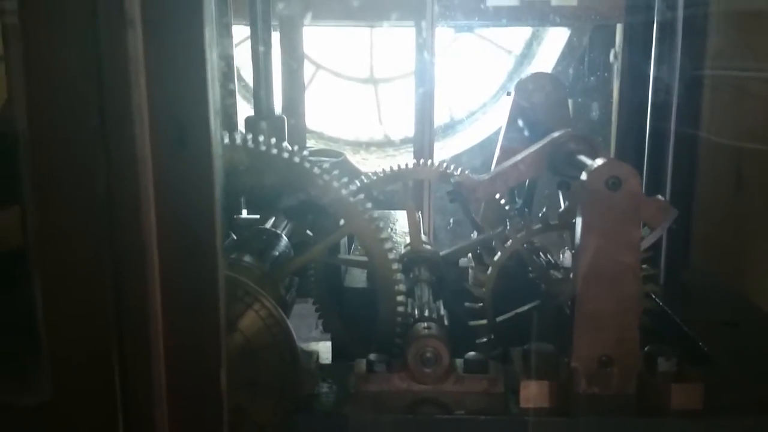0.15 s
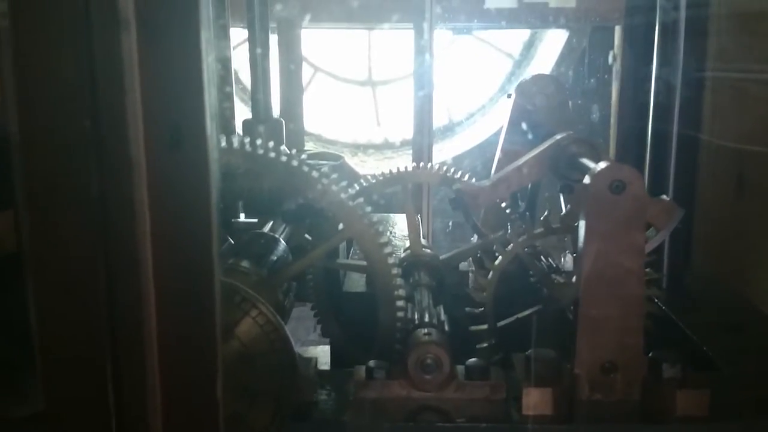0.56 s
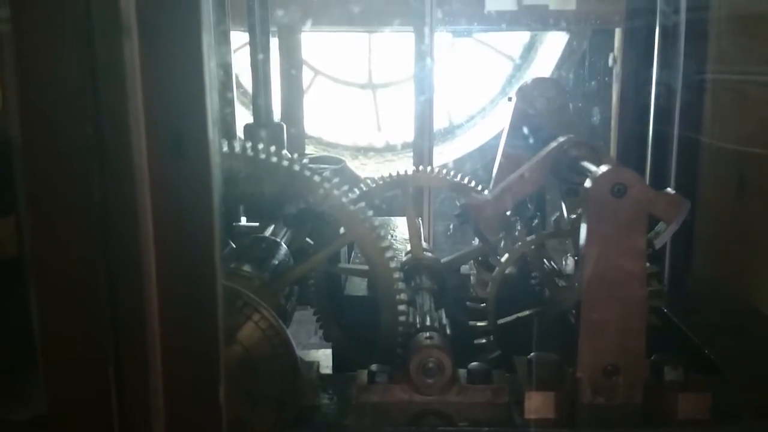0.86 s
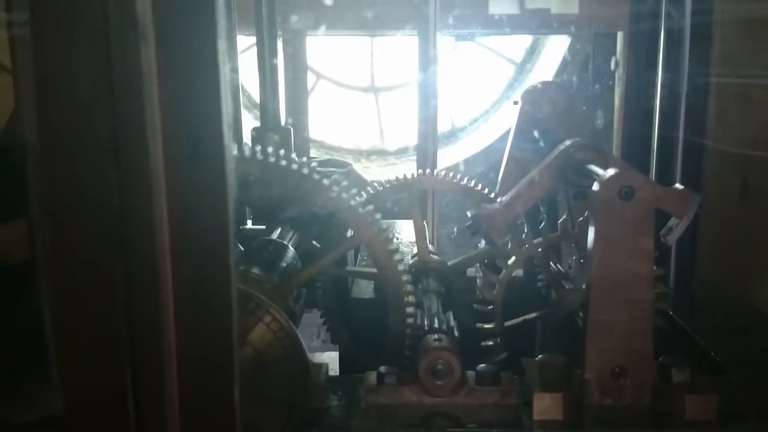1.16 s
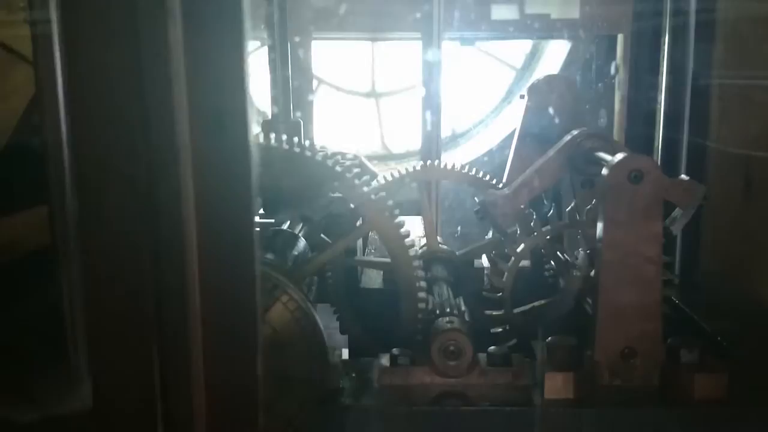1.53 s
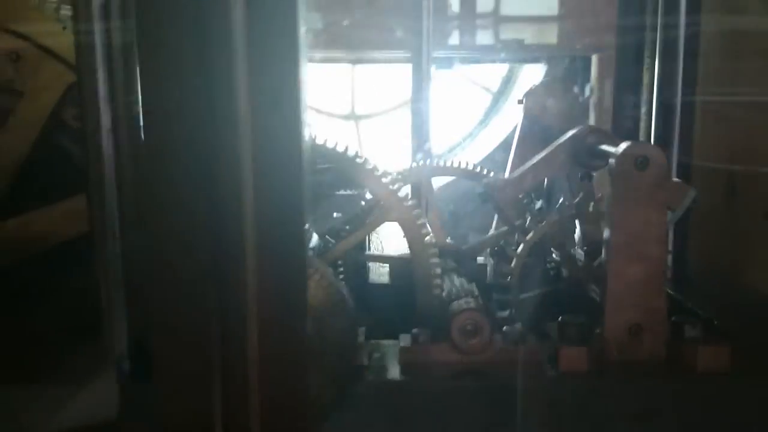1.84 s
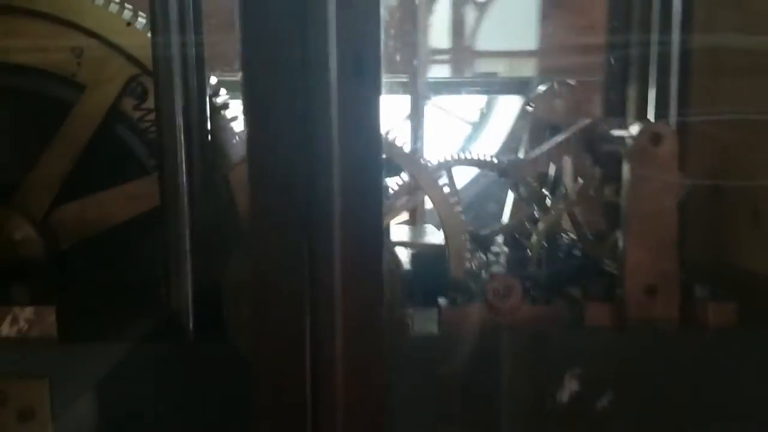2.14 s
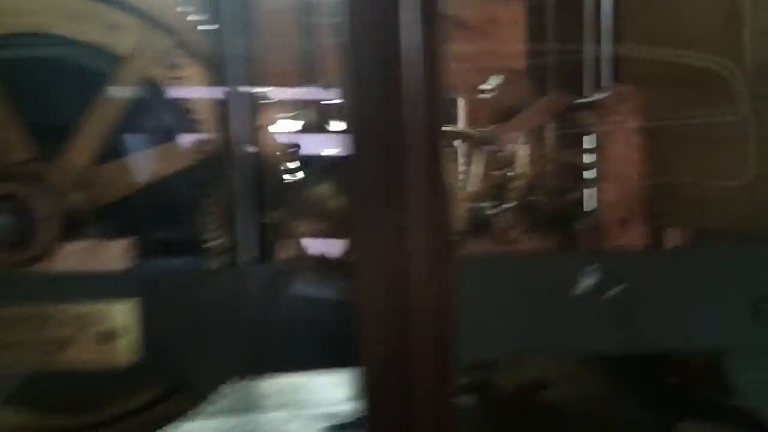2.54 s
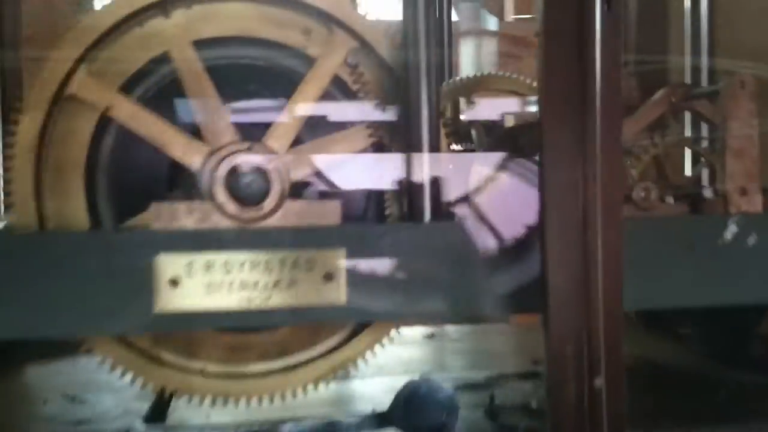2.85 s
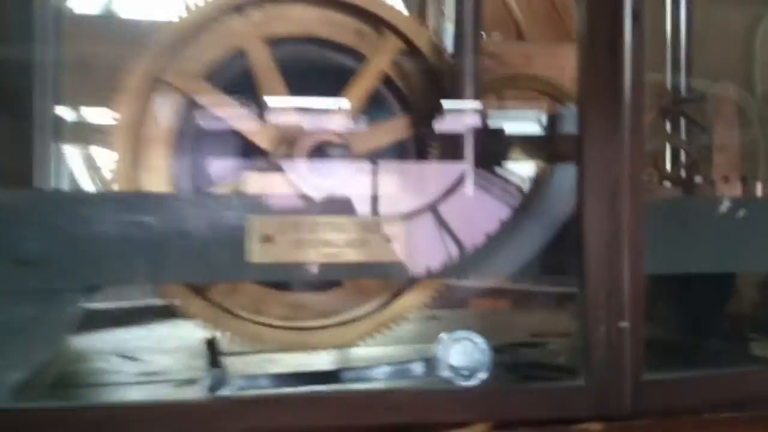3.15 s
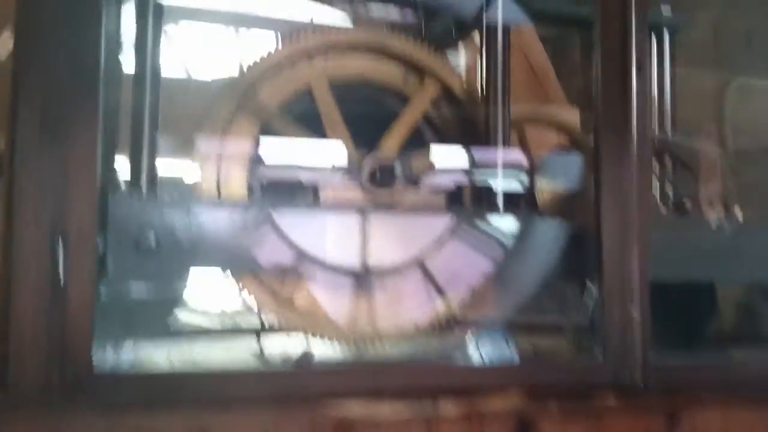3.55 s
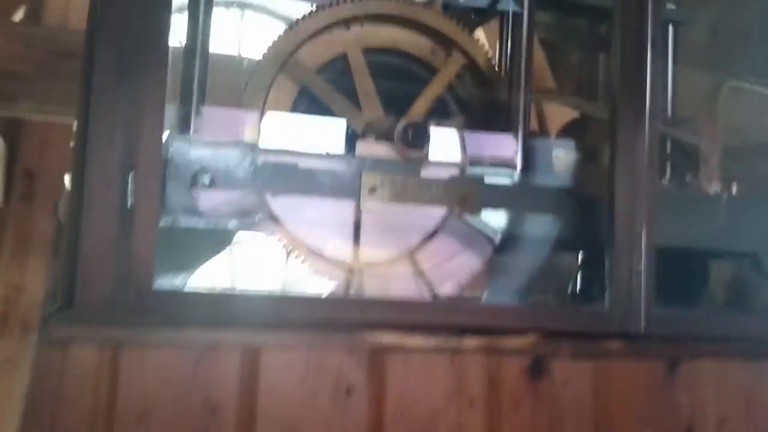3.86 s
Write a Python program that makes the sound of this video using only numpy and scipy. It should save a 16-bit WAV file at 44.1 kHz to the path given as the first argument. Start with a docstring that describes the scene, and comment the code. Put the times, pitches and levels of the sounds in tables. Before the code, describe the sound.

Tower clock mechanism ticks about once a second in a quiet loft, with late microphone handling bumps

```python
"""A quiet loft: a tower clock ticks about once a second inside its glazed wooden case.
Each drop of the escapement rattles the frame (noise dying band by band) and rings wheels and pallets (tones).
Fingers bump, click and rub the shell of a hand-held camera, mostly from halfway and near the right microphone:
bumps are filtered pushes into resonances, rubs are coloured stick-slip grains. One metallic clink sounds.
Faint air noise, hum and whine lie underneath."""
import sys
import numpy as np
from scipy import signal
from scipy.fft import rfft, irfft
from scipy.io import wavfile
from scipy.ndimage import uniform_filter1d

SR = 44100
rng = np.random.default_rng(int(sys.argv[2]) if len(sys.argv) > 2 else 0)


def unload_wav(signal):
    """Save mono or channel-first audio to the path in sys.argv[1] as 16-bit WAV at rate SR, clipped to [-1, 1]."""
    wavfile.write(
        sys.argv[1],
        SR,
        np.round(np.clip(np.atleast_2d(signal).T, -1, 1) * 32767).astype(np.int16),
    )


N = 176400
T = np.arange(N) / SR  # s

# Still air and hiss. Each row: frequency in Hz, relative level in dB per Hz.
LOFT_SPECTRUM = [(25, -18.5), (64, -6), (113, -12), (150, -15), (260, -15), (360, -15.5), (700, -16.5),
                 (2000, -21), (5600, -25.5), (15500, -28.5)]
LOFT_DB = -66
# Faint hum and whine. Each row: frequency in Hz, level in dB.
LOFT_TONES = [(59, -88), (264, -87.5), (15000, -83)]

# Finger contacts. Each row: start in seconds, thud push in dB, knock push in dB,
# contact brightness (low-pass) in Hz, base t60 of the thud in seconds.
BUMPS = [(0.097, -56, -41, 245, .04), (0.415, -47, -70, 302, .07), (2.161, -59, -49, 1200, 0.044),
         (2.3985, -38, -39, 710, 0.035), (2.409, -19.5, -11.5, 1130, 0.089),
         (2.492, -24.5, -43, 486, 0.043), (2.542, -50.5, -51, 300, 0.064), (2.796, -23, -23.5, 800, 0.032),
         (2.83, -33, -44, 600, 0.048), (2.902, -45, -32, 800, 0.045), (3.106, -37.5, -41.5, 590, 0.054),
         (3.344, -34.5, -38, 596, 0.057), (3.382, -17.5, -31, 800, 0.055), (3.412, -45, -30, 1200, 0.066),
         (3.419, -15.5, -50, 257, 0.048), (3.519, -22, -24, 795, 0.028), (3.534, -25.5, -23.5, 1480, 0.033),
         (3.539, -58, -19, 1590, 0.044), (3.5443, -37, -20, 1480, 0.036), (3.653, -15, -27, 225, 0.13),
         (3.726, -23, -36, 593, .1), (3.742, -23.5, -17.5, 1010, .08), (3.812, -6.5, -14, 560, 0.19),
         (3.846, -14.5, -19, 295, 0.074), (3.8625, -35, -27, 1300, .06), (3.875, -17, -22, 500, 0.19),
         (3.8944, -28, -28, 1500, .1), (3.933, -18.5, -26, 1100, 0.15), (3.9654, -20.5, -12, 3230, 0.066)]
# Slow flexing of the shell. Each row: frequency in Hz, gain in dB, share of the bump's base t60 [ratio].
THUD_MODES = [(57, 3, 0.68), (78, -6, 0.83), (124.7, -0.5, 0.35), (182, -12.5, 0.16)]
THUD_SOFT_HZ, THUD_SOFT_SHARE, THUD_HIGHPASS_HZ, THUD_LEFT_DB = 250, 0.37, 39, -28
# Knock of the shell. Each row: frequency in Hz, gain at right in dB, t60 in seconds, left re right in dB.
KNOCK_MODES = [(210, -9, 0.014, -18), (316.4, -0.5, 0.031, -23.5), (437, -1, 0.019, -26),
               (663, -7, .016, -23), (1190, -21, 0.014, -6.5), (1920, -9.5, 0.0027, -13),
               (4500, -17.5, 0.018, 4)]

# Escapement drops. Each row: start in seconds, level in dB, extra treble of the frame in dB,
# voicing [index] (0 first pallet, 1 second pallet, 2 first pallet heard beside the great wheel).
TICKS = [(0.803, -45, 1, 0), (1.828, -46, -3.5, 1), (2.801, -43, 0, 2), (3.83, -42, -4.5, 1)]
RISE_S, RATTLE_S, TREBLE_HZ = 0.0033, 0.031, 6000
# Dense frame modes. Each row: frequency in Hz, relative level in dB per Hz.
FRAME_SPECTRUM = [(100, -13), (210, -14), (290, 2.5), (450, -5), (620, -6.5), (860, -3.5), (1150, -15.5),
                  (1800, -11.5), (2700, -17.5), (3200, -15.5), (4000, -17), (4800, -12.5), (5600, -15),
                  (6500, -24.5), (10000, -22.5), (13000, -25.5), (15500, -18)]
# Decay of the case. Each row: frequency in Hz, t60 in seconds.
CASE_T60 = [(200, 0.45), (800, 0.28), (2000, 0.26), (5000, 0.23), (15000, 0.28)]
# Wheel and pallet modes. Each row: frequency in Hz, level re the tick in dB for voicings 0, 1 and 2,
# t60 in seconds.
WHEEL_MODES = [(283, -22, -8, -25, 0.32), (335, -5.5, -25, -18, 0.39), (430, -8, -37, -2, 0.36),
               (482.7, -9.5, -24, -12, 0.36), (570, -28, -17, -20, 0.29), (713, -10, -27, -3.5, 0.34),
               (820, -15, -15.5, -28, 0.14), (1419, -13, -13.5, -13, 0.11), (1540, -34, -32, -20.5, 1),
               (1800, -14.5, -18, -22, 0.43), (1820, -17.5, -36, -20, 0.87), (3110, -13.5, -15, -31, .2),
               (4710, -9.5, -12, -30, 0.21), (4840, -38, -10, -36, 0.31), (5370, -27, -15, -30, 0.35),
               (14800, -8, -25, -18, .17)]
MODE_WIDTH_HZ, MODE_WIDTH_SHARE = 9.95, 0.01206

# Small dry clicks of the grip. Each row: start in seconds, level before the trim in dB, left minus right in dB.
CLICKS = [(1.552, -64, -12), (1.558, -49, -8), (1.565, -49, -13), (1.5735, -40, -7), (1.604, -49, -8),
          (2.004, -42, -4), (2.139, -54, -1), (2.1615, -42.5, 0), (2.491, -40.5, -8), (2.943, -44, 8),
          (3.105, -45, -4), (3.207, -47, -2), (3.4, -31, -22), (3.497, -43, -13), (3.753, -32, -13),
          (3.965, -38, 8)]
# Colour of the clicks. Each row: frequency in Hz, relative level in dB per Hz.
CLICK_SPECTRUM = [(300, -2), (3300, -13.5), (4900, 3.5), (5700, -4.5), (7000, -13), (11000, -4),
                  (15500, -3.5)]
CLICK_TRIM_DB, CLICK_RISE_S, CLICK_HOLD_S, CLICK_T60_S = -6.5, 0.00043, 0.00033, 0.0095

# Metal modes of the clink. Each row: frequency in Hz, relative level in dB.
CLINK_MODES = [(3650, -13.5), (4300, -20), (4950, -27), (5600, 0.5), (5900, -3), (7050, -21)]
# Colour of the clink's room tail. Each row: frequency in Hz, relative level in dB per Hz.
CLINK_TAIL_SPECTRUM = [(2500, -14.5), (3500, -20), (5000, -9), (5600, -1.5), (6100, -9), (6800, -18.5),
                       (15000, -23)]
CLINK_START_S, CLINK_DB, CLINK_T60_S, CLINK_WIDTH_HZ = 2.342, -34.5, 0.012, 150
CLINK_TAIL_DB, CLINK_TAIL_HOLD_S, CLINK_TAIL_T60_S = -17, 0.016, 0.26  # level re the ping

# Skin rubbing on the shell, in three spells. Each row: time in seconds,
# then levels before the trims in dB of the middle, the hiss and the top.
RUB_FIRST = [(2.62, -81, -69, -90), (2.626, -87, -88, -90), (2.656, -69.5, -68.5, -88),
             (2.686, -77, -77, -77), (2.708, -56.5, -68.5, -80), (2.73, -78, -80, -79),
             (2.76, -75, -70, -88)]
RUB_SECOND = [(2.88, -55, -65, -71), (2.908, -57.5, -56.5, -70), (2.924, -69, -65, -68),
              (3.064, -73.5, -75, -82), (3.112, -63.5, -54, -64), (3.122, -68, -66.5, -72),
              (3.142, -67, -61.5, -70), (3.164, -59.5, -61.5, -69), (3.22, -56, -53.5, -71),
              (3.316, -62, -63, -72), (3.352, -58.5, -57, -69), (3.36, -59, -60, -69)]
RUB_THIRD = [(3.36, -61.5, -64, -72), (3.392, -37.5, -39, -55), (3.426, -49.5, -48.5, -50),
             (3.468, -67.5, -63, -67), (3.5, -48.5, -51.5, -58), (3.526, -55, -61, -64.5),
             (3.54, -47, -56, -62), (3.57, -58.5, -57.5, -61), (3.66, -65.5, -57.5, -64),
             (3.678, -64, -46.5, -56), (3.71, -55, -49.5, -58.5), (3.746, -39.5, -43, -54.5),
             (3.772, -45.5, -45, -50.5), (3.816, -40, -51.5, -58), (3.826, -47.5, -53, -60),
             (3.862, -47.5, -49, -58), (3.956, -54, -53, -62), (3.966, -39, -46, -65),
             (3.984, -50, -49.5, -58), (4.0, -64, -49, -58)]
# Colours of the three rub bands. Each row: frequency in Hz, relative level in dB per Hz.
RUB_MIDDLE_SPECTRUM = [(60, 3), (130, 3.5), (220, -4), (330, 5.5), (480, -1), (670, -1.5), (900, -11),
                       (1150, -7.5), (1600, -15), (2200, -16.5), (3300, -24.5), (6000, -34.5)]
RUB_HISS_SPECTRUM = [(2000, -12), (3300, -14), (4400, -3), (5500, -0.5), (6300, -10.5), (7500, -23),
                     (10000, -26)]
RUB_TOP_SPECTRUM = [(4500, -32), (7000, -0.5), (10000, 0.5), (13000, -4), (15500, 3)]
# Relative trims of middle, hiss and top in dB, before the common trim.
RUB_TRIMS_DB = [4.5, 0, 2]
RUB_COMMON_TRIM_DB = 3
# Left minus right of middle, hiss and top in dB.
RUB_PAN_DB = [-12.5, -1, -3.5]
SLIPS_PER_S, SLIP_SPREAD_DB, RUB_FLUTTER_DB = 2600, 2.5, 1.5
SHELL_RIPPLE_DB, SHELL_RIPPLE_HZ = 3, 59.4  # rms unevenness, smoothing width

LOW_CUT_HZ, HIGH_CUT_HZ = 32, 15850


def from_db(db):
    """Decibels to gain."""
    return 10 ** (np.asarray(db) / 20)


def rms_one(x):
    """Scale to rms 1."""
    return x / np.sqrt(np.mean(x ** 2) + 1e-20)


def at_hz(points, hz):
    """Read a table on a log-frequency axis."""
    f, value = np.transpose(points)
    return np.interp(np.log(hz + 1e-9), np.log(f), value)


def pan(db):
    """Left and right gains of equal total power; db is left minus right."""
    return rms_one(from_db([[db / 2], [-db / 2]]))


def white():
    """Unrelated noise in each channel."""
    return rng.standard_normal((2, N))


def colour(x, spectrum):
    """Give a steady signal a spectrum; rms 1."""
    hz = np.arange(N // 2 + 1) * SR / N
    return rms_one(irfft(rfft(x) * from_db(at_hz(spectrum, hz)), N))


def line(hz, width_hz):
    """A cluster of close modes: an even tone whose phase wanders, differently at each microphone."""
    steps = white() * np.sqrt(2 * np.pi * abs(width_hz) / SR)
    smooth = max(1, int(SR / (4 * abs(width_hz) + 1)))
    wander = uniform_filter1d(np.cumsum(steps, axis=1), size=smooth, axis=1)
    return np.sqrt(2) * np.sin(2 * np.pi * hz * T + wander)


def burst(start_s, rise_s, hold_s, t60_s):
    """Envelope: linear rise, exponential decay; the hold counts from the start."""
    rise = np.clip((T - start_s) / rise_s, 0, 1)
    decay_s = np.maximum(T - start_s - hold_s, 0)
    return rise * np.exp(-np.minimum(np.log(1000) * decay_s / t60_s, 40))


def ring(force, hz, t60_s):
    """Two-pole resonance: a click sets a decaying sine ringing."""
    r = np.exp(-np.log(1000) / (t60_s * SR))
    w = 2 * np.pi * hz / SR
    return signal.lfilter([0, np.sin(w)], [1, -2 * r * np.cos(w), r * r], force + 1e-18)


def push(start_s, db, hz):
    """A soft contact: one steeply low-passed click."""
    click = np.full(N, 1e-18)
    click[min(int(start_s * SR), N - 1)] = from_db(db)
    return signal.sosfilt(signal.butter(3, min(hz, SR / 4), fs=SR, output="sos"), click)


def loft():
    """Quiet air as coloured noise, with a faint hum and whine."""
    air = from_db(LOFT_DB) * colour(white(), LOFT_SPECTRUM)
    return air + sum(from_db(db) * line(hz, width_hz=9) for hz, db in LOFT_TONES)


def bumps():
    """Contacts flex the shell and knock on it; soft ones push slowly, a firm grip damps the flexing."""
    thud = 0
    for start_s, thud_db, _, contact_hz, t60_s in BUMPS:
        force = push(start_s, thud_db, min(THUD_SOFT_HZ, THUD_SOFT_SHARE * contact_hz))
        for hz, db, share in THUD_MODES:
            thud = thud + from_db(db) * ring(force, hz, t60_s * share)
    thud = signal.sosfilt(signal.butter(2, THUD_HIGHPASS_HZ, "high", fs=SR, output="sos"), thud)

    force = sum(push(start_s, db, hz) for start_s, _, db, hz, _ in BUMPS)
    knock = 0
    for k, (hz, db, t60_s, left_db) in enumerate(KNOCK_MODES):
        gains = from_db([[db + left_db], [db]])
        knock = knock + gains * ring(force, hz, t60_s) * (-1) ** k  # alternate polarity
    return thud * from_db([[THUD_LEFT_DB], [0]]) + knock


def frame_rattle():
    """Each drop shakes the frame's dense modes, which die band by band."""
    out = 0
    hz = np.arange(N // 2 + 1) * SR / N
    frame = rfft(colour(white(), FRAME_SPECTRUM))
    edges_hz = np.geomspace(50, 18000, 13)
    for low, high in zip(edges_hz, edges_hz[1:]):
        band = irfft(frame * ((hz >= low) & (hz < high)), N)
        centre_hz = np.sqrt(low * high)
        t60_s = at_hz(CASE_T60, centre_hz)
        for start_s, db, treble_db, _ in TICKS:
            gain = from_db(db + treble_db * (centre_hz > TREBLE_HZ))
            out = out + band * gain * burst(start_s, RISE_S, RATTLE_S, t60_s)
    return out


def wheel_ring():
    """Each drop rings wheel and pallet modes, balanced by its voicing."""
    out = 0
    for hz, *voicing_db, t60_s in WHEEL_MODES:
        level = 0
        for start_s, db, _, voicing in TICKS:
            level = level + from_db(db + voicing_db[voicing]) * burst(start_s, RISE_S, RATTLE_S / 2, t60_s)
        width_hz = MODE_WIDTH_HZ + MODE_WIDTH_SHARE * hz * min(1, hz / TREBLE_HZ)
        out = out + level * line(hz, width_hz)
    return out


def escapement():
    """Each drop rattles the frame and rings the wheels and pallets."""
    return frame_rattle() + wheel_ring()


def clicks():
    """Tiny snaps as the grip shifts: short bursts of coloured noise."""
    level = 0
    for start_s, db, side_db in CLICKS:
        snap = burst(start_s, CLICK_RISE_S, CLICK_HOLD_S, CLICK_T60_S)
        level = level + from_db(db + CLICK_TRIM_DB) * pan(side_db) * snap
    return colour(white(), CLICK_SPECTRUM) * level


def clink():
    """A short metallic ping of close modes with a faint diffuse room tail of noise."""
    metal = rms_one(sum(from_db(db) * line(hz, CLINK_WIDTH_HZ) for hz, db in CLINK_MODES))
    ping = metal * burst(CLINK_START_S, 0.0014, 0.003, CLINK_T60_S) * pan(db=-8)
    tail_envelope = burst(CLINK_START_S, 0.0036, CLINK_TAIL_HOLD_S, CLINK_TAIL_T60_S)
    tail = from_db(CLINK_TAIL_DB) * colour(white(), CLINK_TAIL_SPECTRUM) * tail_envelope
    return from_db(CLINK_DB) * (ping + tail)


def ripple(x):
    """Many narrow resonances of the shell, different at each microphone."""
    spectrum = rfft(x)
    width_bins = max(1, int(SHELL_RIPPLE_HZ * N / SR))
    uneven = uniform_filter1d(rng.standard_normal(spectrum.shape), size=width_bins, axis=1)
    return irfft(spectrum * from_db(SHELL_RIPPLE_DB * rms_one(uneven)), N)


def rub_level(column):
    """Level of one rub band: straight lines in dB within each spell, silence outside."""
    level = 0
    for spell in (RUB_FIRST, RUB_SECOND, RUB_THIRD):
        rows = np.array(spell)
        level = level + from_db(np.interp(T, rows[:, 0], rows[:, column], left=-np.inf, right=-np.inf))
    return level


def rubbing():
    """Dense stick-slip grains, coloured by the shell and the microphone port, swell with each stroke."""
    out = 0
    for k, spectrum in enumerate((RUB_MIDDLE_SPECTRUM, RUB_HISS_SPECTRUM, RUB_TOP_SPECTRUM)):
        hits = rng.random((2, N)) < SLIPS_PER_S / SR
        strength_db = SLIP_SPREAD_DB * np.minimum(rng.exponential(1, (2, N)), 4)
        slips = hits * white() * from_db(strength_db)
        wobble = rms_one(uniform_filter1d(rng.standard_normal(N), size=300))
        flutter = from_db(RUB_FLUTTER_DB * wobble)
        gain = from_db(RUB_TRIMS_DB[k] + RUB_COMMON_TRIM_DB) * pan(RUB_PAN_DB[k])
        out = out + colour(ripple(slips), spectrum) * flutter * rub_level(k + 1) * gain
    return out


def scene():
    """The room, the handling and the clock."""
    return loft() + bumps() + escapement() + clicks() + clink() + rubbing()


def record(dry):
    """The deepest bass and the top are cut."""
    dry = signal.sosfilt(signal.butter(3, LOW_CUT_HZ, "high", fs=SR, output="sos"), dry)
    return signal.sosfilt(signal.ellip(12, 0.1, 80, HIGH_CUT_HZ, fs=SR, output="sos"), dry)


dry = scene()
out = record(dry)
unload_wav(out)
```